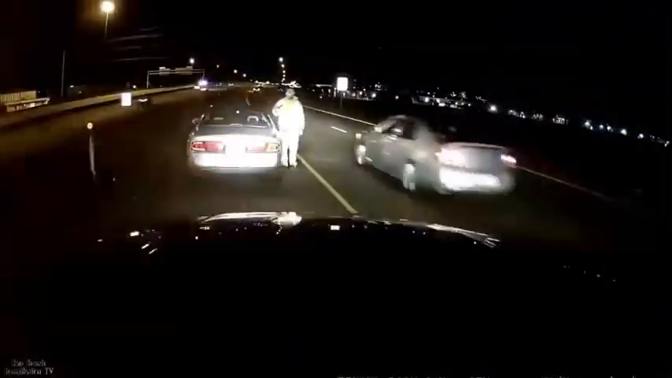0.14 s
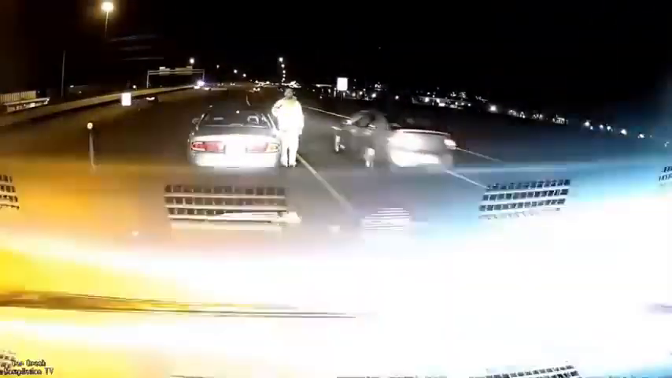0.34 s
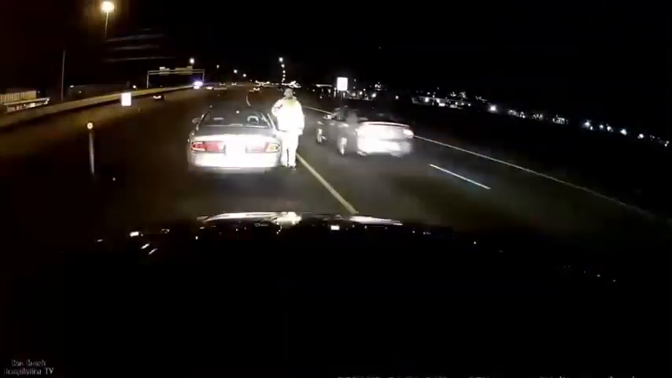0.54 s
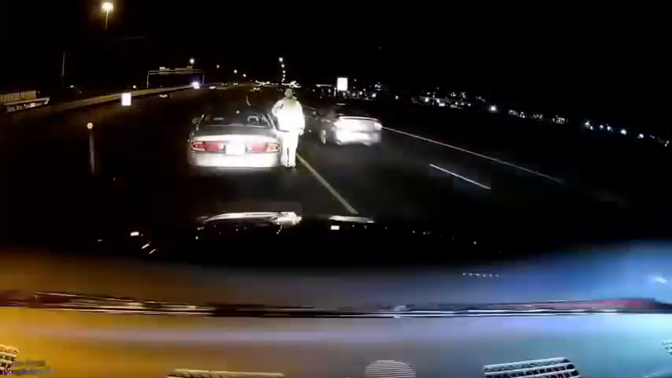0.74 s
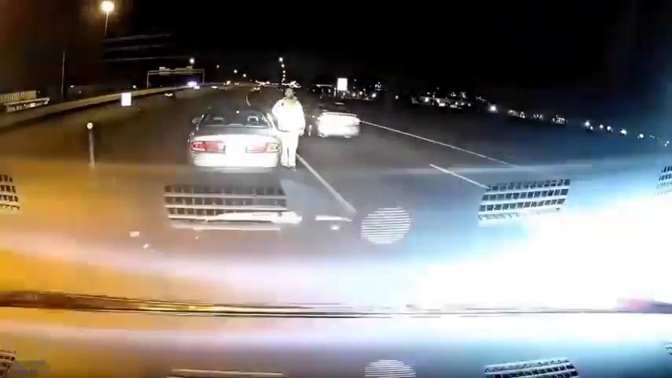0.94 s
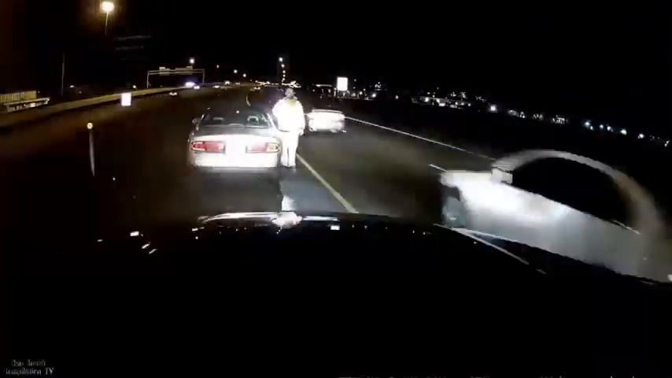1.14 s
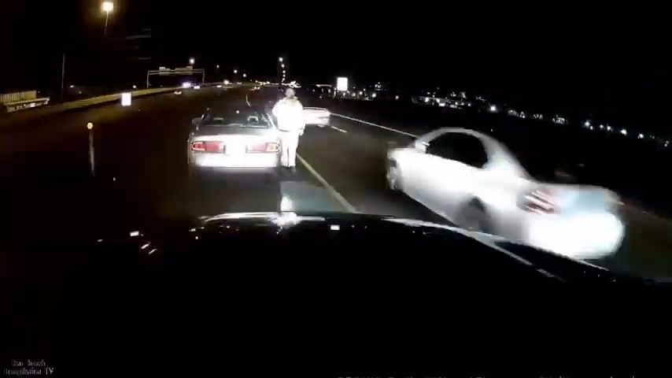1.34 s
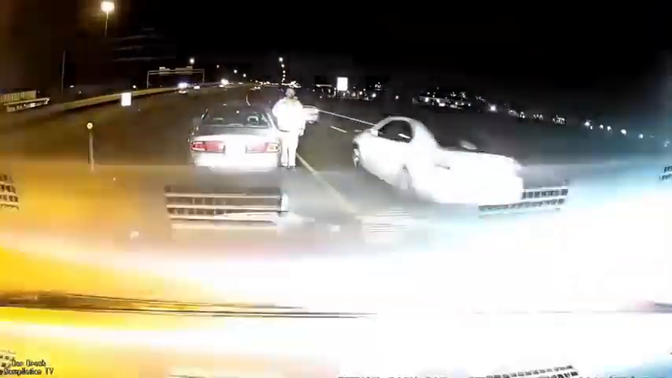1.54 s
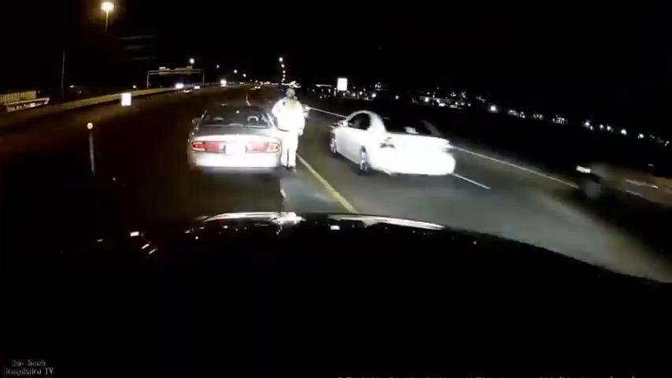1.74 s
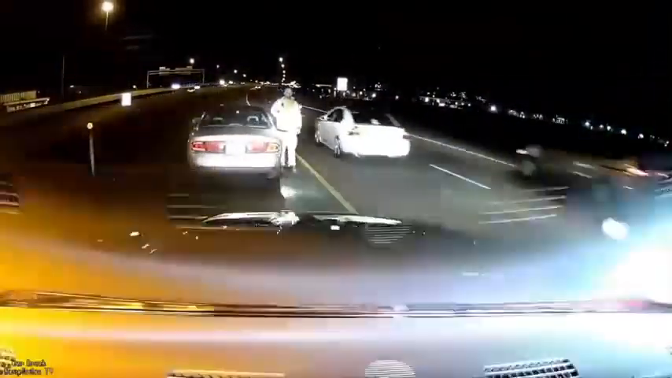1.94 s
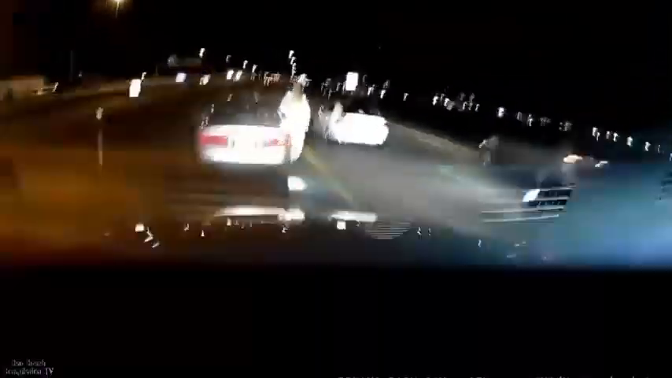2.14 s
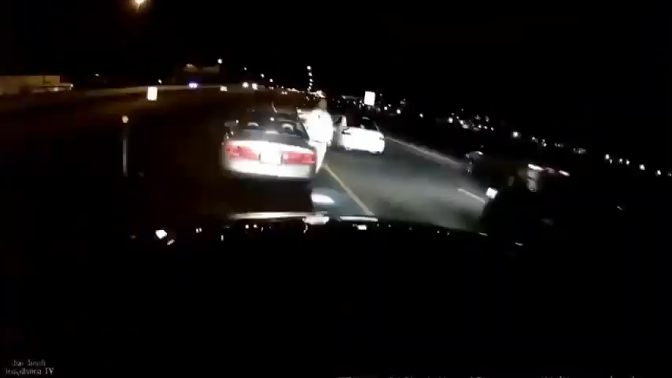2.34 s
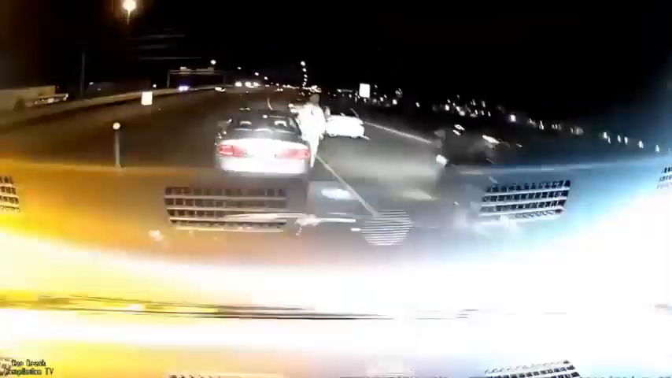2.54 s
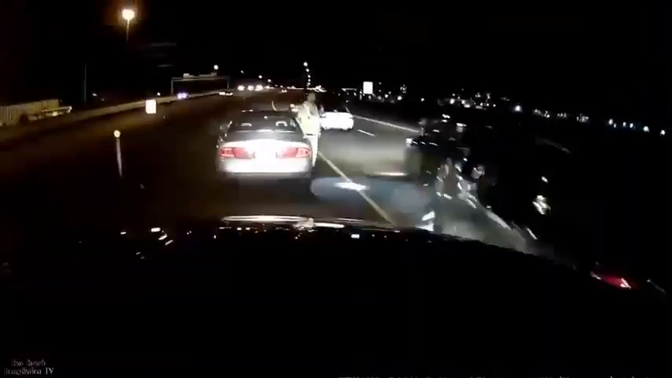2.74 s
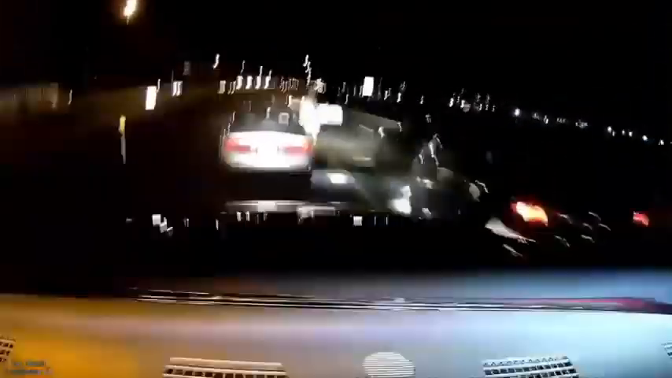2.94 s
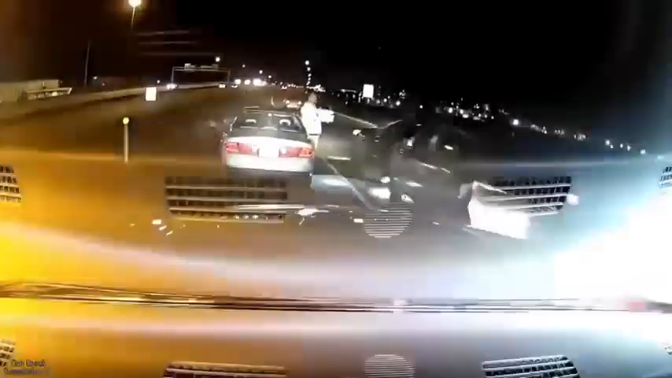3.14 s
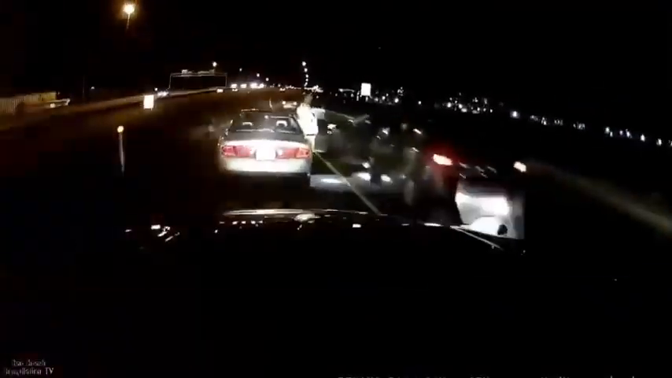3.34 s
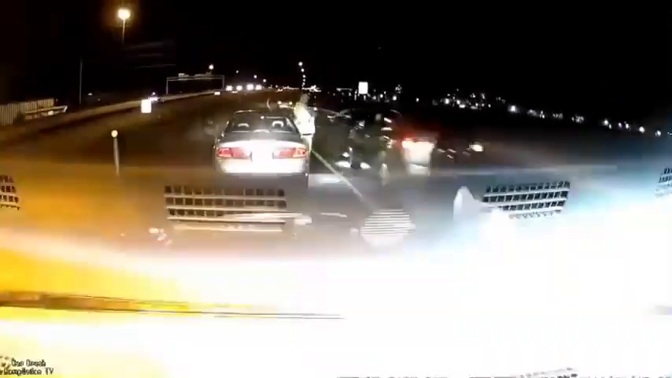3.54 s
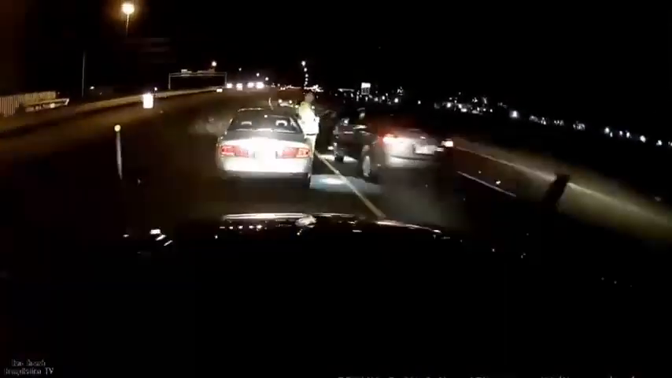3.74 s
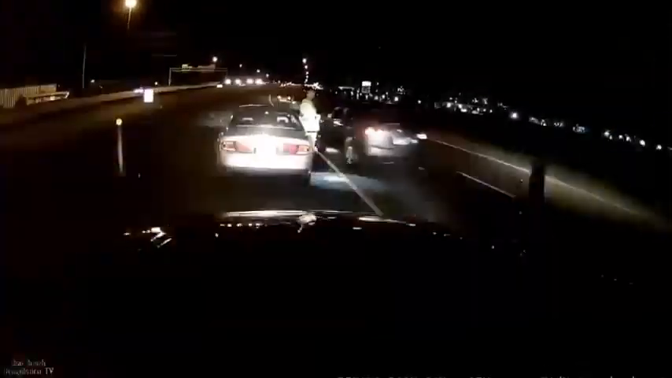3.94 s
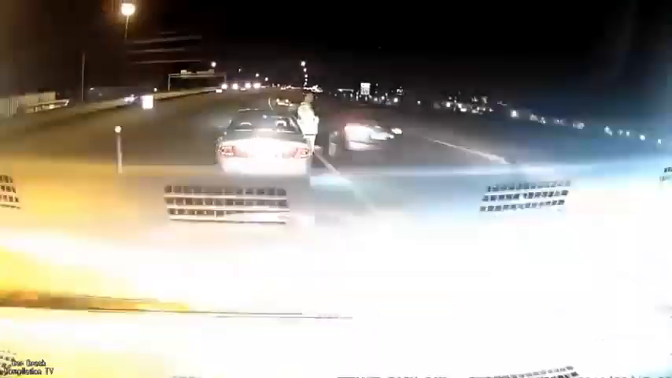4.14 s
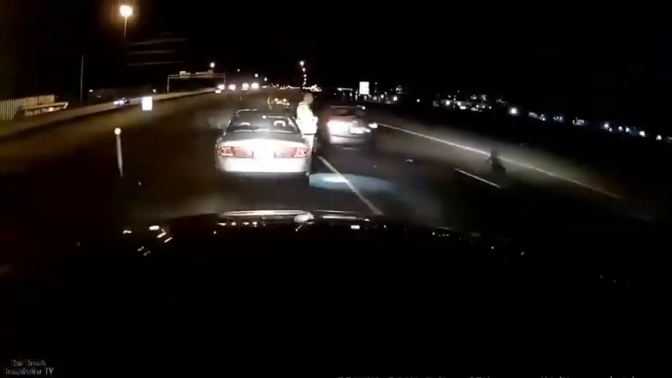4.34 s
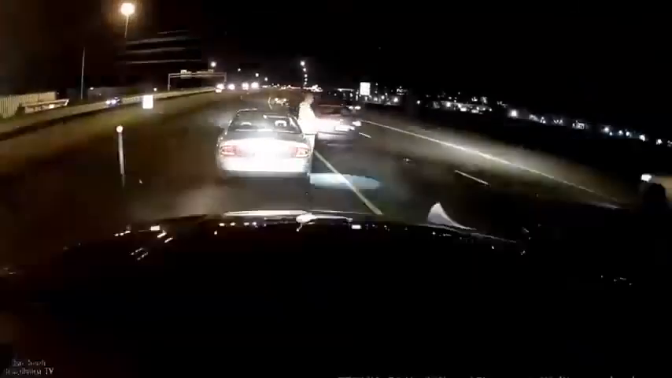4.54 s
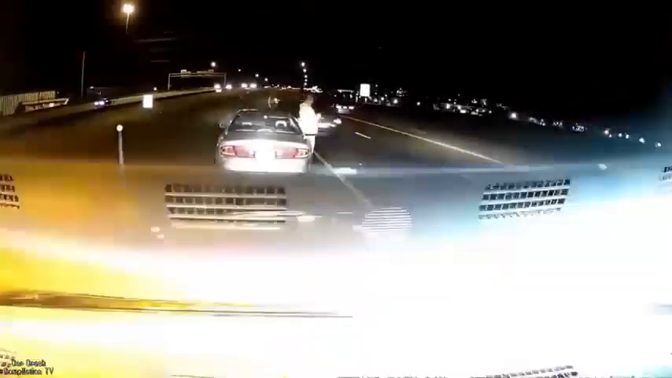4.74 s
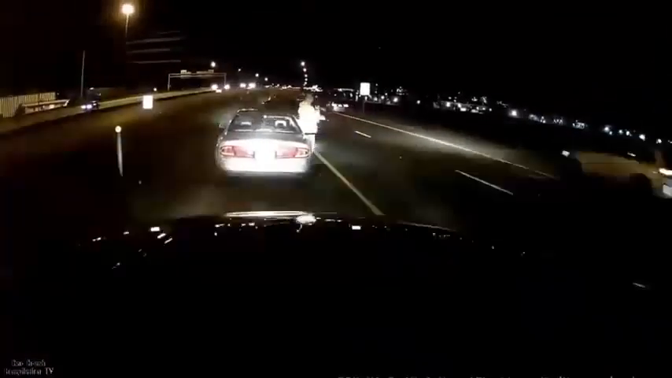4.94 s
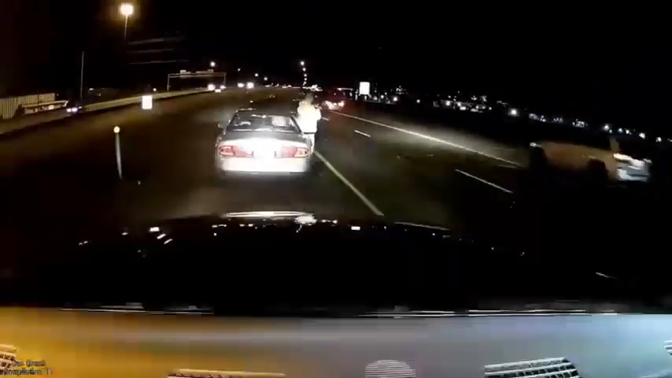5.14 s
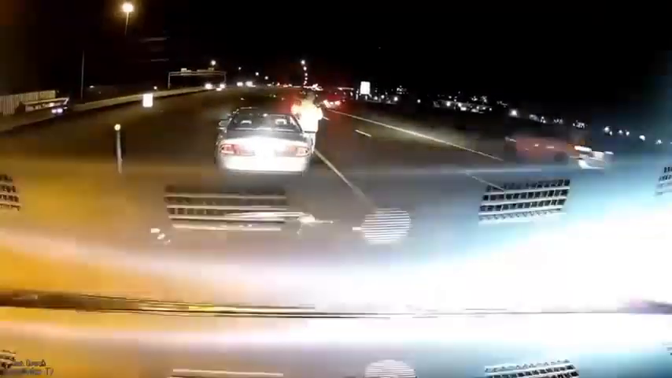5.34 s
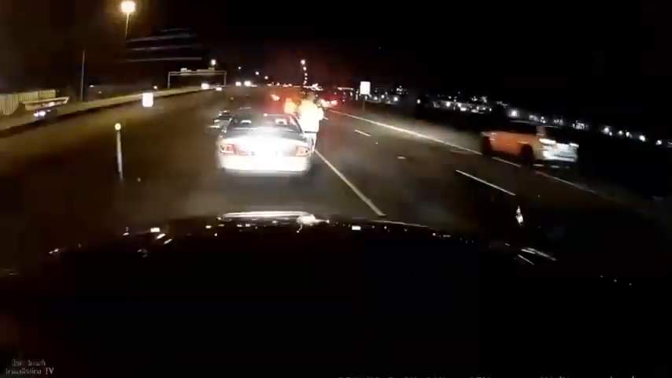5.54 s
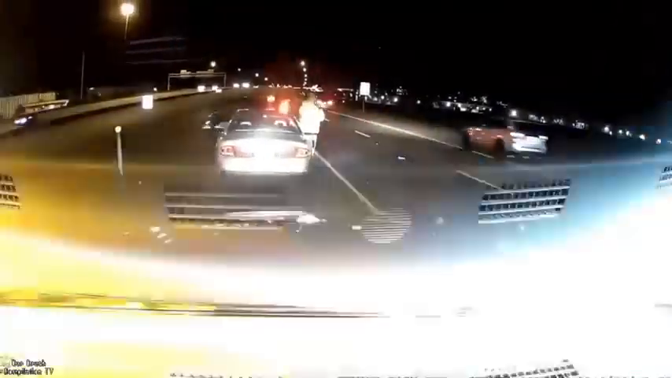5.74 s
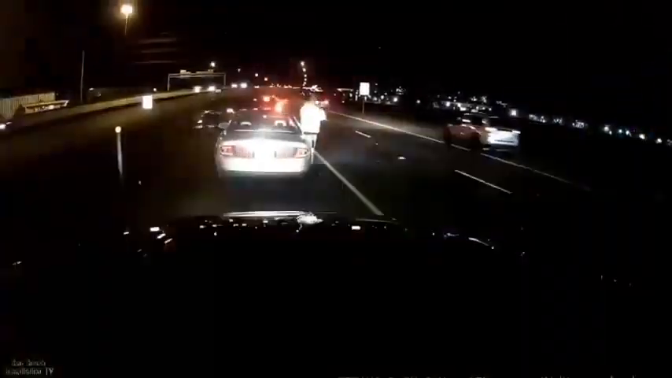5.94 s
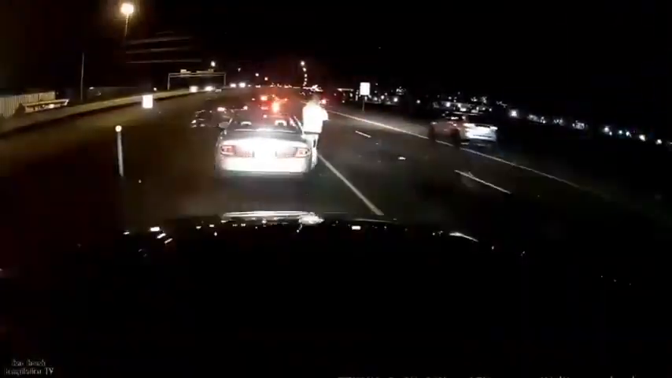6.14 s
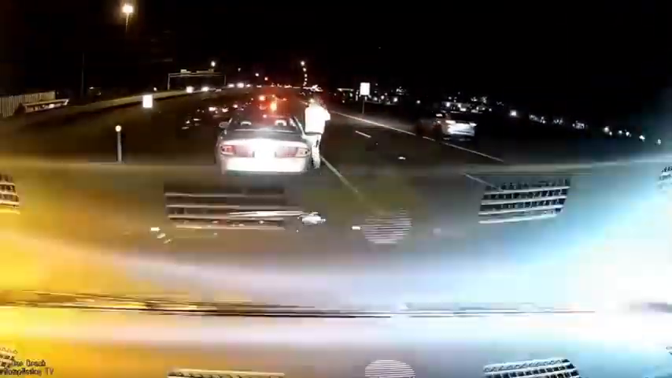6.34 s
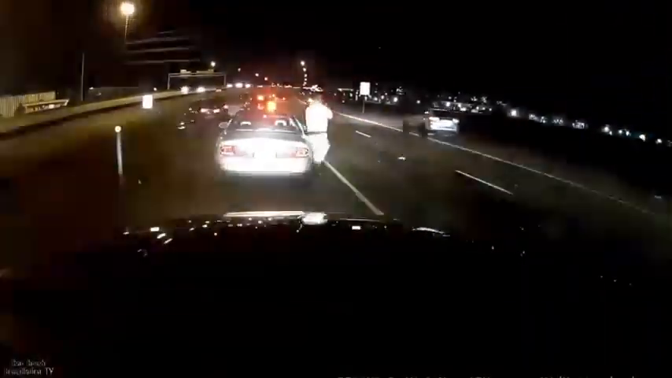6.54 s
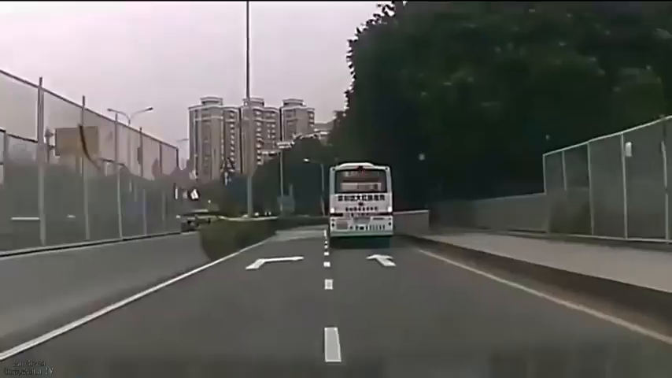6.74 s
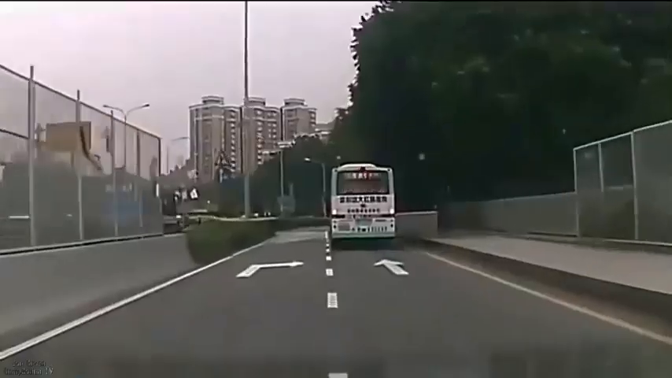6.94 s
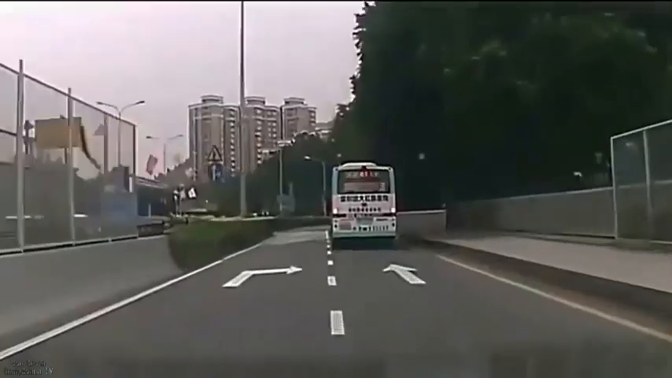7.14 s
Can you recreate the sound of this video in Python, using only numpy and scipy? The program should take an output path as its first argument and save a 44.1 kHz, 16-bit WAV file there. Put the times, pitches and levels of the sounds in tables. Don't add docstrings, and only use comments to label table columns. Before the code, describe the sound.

A microphone in a closed car cabin picks up boomy road noise and one close pass. Brief braking squeals lead into a distorted double-surge collision, with heavy thuds, folding sheet metal and grinding. Very sharp glass cracks come moments later, then rattling fragments, low suspension throbs and a second tyre squeal. Traffic continues under small clicks until an abrupt cut, followed by another car's soft low hum.

```python
import sys
import numpy as np
from scipy import signal
from scipy.fft import rfft, irfft, next_fast_len
from scipy.io import wavfile
from scipy.ndimage import map_coordinates

SR = 44100
rng = np.random.default_rng(int(sys.argv[2]) if len(sys.argv) > 2 else 0)


def unload_wav(signal):
    wavfile.write(
        sys.argv[1],
        SR,
        np.round(np.clip(np.atleast_2d(signal).T, -1, 1) * 32767).astype(np.int16),
    )


def ratio_of_db(decibels):
    return 10 ** (np.asarray(decibels, float) / 20)


N = 321165
HIT_S, CUT_S = 2.088, 6.687


def unit(x):
    return x / np.sqrt(np.mean(x ** 2) + 1e-20)


def seconds():
    return np.arange(N) / SR


def curves(rows, held=False):
    s, *columns = np.transpose(rows)
    outside = [] if held else [-150, -150]
    return [np.interp(seconds(), s, column, *outside) for column in columns]


def wobble(rate):
    knots = rng.standard_normal(int(N * rate / SR) + 4)
    return map_coordinates(knots, [np.arange(N) * rate / SR])


def filtered(x, response):
    m = next_fast_len(N + 8192)
    return irfft(rfft(x, m) * response(np.fft.rfftfreq(m, 1 / SR)), m)[..., :N]


def resonant(x, modes):
    return filtered(x, lambda f: sum(ratio_of_db(db) * f * w / (hz * hz - f * f + 1j * f * w) for hz, w, db in modes))


def rush(spectrum, grit_db, rate):
    f, v = np.transpose(spectrum)
    source = rng.standard_normal(N) * ratio_of_db(grit_db * wobble(rate))
    return unit(filtered(source, lambda hz: ratio_of_db(np.interp(np.log(hz + 1), np.log(f + 1), v))))


# [f/Hz, level/dB per Hz]
RUMBLE = [(12, -38), (20, 3), (42, -3.5), (92, -3), (125, -11), (145, -17.5), (171, -6.5), (194, 0),
          (260, -27.5), (320, -9.5), (420, -47), (700, -120)]
# [f/Hz, level/dB per Hz]
ROAR = [(150, -14), (250, 6.5), (273, -5), (377, -5.5), (626, -5.5), (976, -4), (1090, -12), (1550, -8),
        (2050, -23), (2730, -48), (4620, -120)]
# [f/Hz, level/dB per Hz]
HISS = [(1060, -6), (1800, -30.5), (2240, 10), (2870, 15.5), (5290, -2.5), (6470, -49), (7030, -41.5),
        (8590, -27.5), (14600, -9), (15000, -34), (16000, -54)]
# [f/Hz, level/dB per Hz]
WHOOSH = [(24, -35), (40, -6), (76, -3), (162, -11), (381, 1), (670, -15.5), (1240, -5.5), (2170, -22.5),
          (2990, -16.5), (14000, -61.5)]
# [f/Hz, width/Hz, level/dB]
BOOM = (205, 22, -38.5)
# [f/Hz, width/Hz, level/dB]
SEAL = [(10450, 300, 0), (11800, 300, -3)]
# [t/s, level/dB]
HISS_LEVEL = [(0, -56), (.5, -54), (.8, -55), (1.05, -52), (1.36, -55), (1.5, -47), (1.65, -44), (1.8, -47),
              (1.95, -43), (3.5, -45), (3.95, -46), (4.2, -49), (4.45, -47), (4.8, -54), (5.7, -57), (6.05, -54),
              (6.6, -56)]
# [t/s, level/dB, half width/s, screened off beyond/s]
PASSING = (1.205, -26, .03, .15)
RUMBLE_DB, ROAR_DB, SEAL_DB, QUIET_DB = -44, -38.5, -86, -56
RUMBLE_GROWS, ROAR_GROWS, SEAL_GROWS = .15, .3, 1.3


def traffic():
    hiss_db, = curves(HISS_LEVEL, held=True)
    busy_db = hiss_db - QUIET_DB
    boom = ratio_of_db(BOOM[2]) * unit(resonant(rng.standard_normal(N), [BOOM]))
    rumble = ratio_of_db(RUMBLE_DB + RUMBLE_GROWS * busy_db) * rush(RUMBLE, grit_db=2.5, rate=6.9)
    roar = ratio_of_db(ROAR_DB + ROAR_GROWS * busy_db) * rush(ROAR, grit_db=1.54, rate=20)
    hiss = ratio_of_db(hiss_db - 1.33) * rush(HISS, grit_db=2, rate=150)

    s, db, near, seen = PASSING
    away = seconds() - s
    close = ratio_of_db(db - 25 * (away / seen) ** 6) / np.hypot(1, away / near)
    whoosh = close * rush(WHOOSH, grit_db=1, rate=60)

    draught = ratio_of_db(SEAL_DB + SEAL_GROWS * busy_db) * (away < HIT_S - s)
    seal = (draught + ratio_of_db(-44) * close) * unit(resonant(rng.standard_normal(N), SEAL))
    return rumble + roar + hiss + boom + whoosh + seal


# [f/Hz, level/dB]
WHINE = [(7214, -66), (14422, -75)]


def whine():
    return sum(ratio_of_db(db) * np.sin(2 * np.pi * hz * seconds()) for hz, db in WHINE)


# [t/s, f/Hz, level/dB]
SQUEAL = [
    [(1.4, 940, -47), (1.5, 965, -46), (1.56, 975, -55), (1.62, 1005, -40), (1.7, 900, -49),
     (1.8, 850, -52), (1.9, 737, -47), (2.03, 740, -44)],
    [(3.3, 829, -47), (3.4, 799, -38), (3.6, 800, -45), (3.7, 825, -43), (3.9, 795, -41), (4.08, 815, -45),
     (4.2, 877, -46), (4.35, 880, -57)],
]
OVERTONES = [(1, 0), (2, -1), (3, 0.5), (4, -4)]  # (ratio, dB)
WINDOW_HZ, WINDOW_LEAK = 1800, .2


def squeal():
    out = 0
    for rows in SQUEAL:
        hz, db = curves(rows)
        for ratio, tyre_db in [(1, 4), (1.09, -4)]:
            shaky_hz = ratio * hz * (1 + .016 * wobble(120))
            phase = 2 * np.pi * np.cumsum(shaky_hz) / SR
            tones = sum(ratio_of_db(tone_db) * np.sin(k * phase) for k, tone_db in OVERTONES)
            out = out + ratio_of_db(2.1 * wobble(25) + tyre_db + db) * tones
    return filtered(out, lambda f: WINDOW_LEAK + (1 - WINDOW_LEAK) / (1 + (f / WINDOW_HZ) ** 16))


# [f/Hz, level/dB per Hz]
SHELL = [(8.8, -33.5), (15, -7), (65, -2), (108, -8), (135, -8), (161, -15.5), (200, -15.5), (260, -45),
         (440, -120)]
# [f/Hz, level/dB per Hz]
CRUMPLE = [(71, -21.5), (120, -4), (161, -9), (265, -5.5), (335, -6.5), (398, -10.5), (694, -13),
           (1590, -16.5), (2300, -64), (2990, -58), (5060, -120)]
# [f/Hz, level/dB per Hz]
GRIND = [(1060, -27.5), (1800, 17), (2010, 12), (4470, 5.5), (5030, -5.5), (6210, -10.5), (7000, -17.5),
         (9100, -39), (15400, -120)]
# [f/Hz, level/dB per Hz]
DUST = [(3530, -35), (6000, -9.5), (7340, 5.5), (8400, -0.5), (10100, -1.5), (14900, -12.5), (16000, -3.5)]
# [t/s, push]
LURCH = [(2.094, -1.5), (2.105, .7), (2.146, -1), (2.163, 1.3), (2.170, -2), (2.188, 1.1), (2.202, -1.6),
         (2.275, 1.2), (2.292, -1), (2.357, -1.8), (2.400, 1.9), (2.430, -1), (2.465, .45), (2.562, -.45),
         (2.6, .2)]
# [t/s, level/dB]
CRUSH = [
    (2.05, -43),
    (2.088, -22),
    (2.13, -25),
    (2.21, -25),
    (2.25, -12),
    (2.295, -8),
    (2.36, -25),
    (2.44, -26),
    (2.56, -36),
]
# [t/s, level/dB]
SCRAPE = [
    (2.5, -41),
    (2.68, -32),
    (2.74, -30),
    (2.83, -21),
    (2.9, -30),
    (3.07, -31),
    (3.36, -39),
    (3.45, -49),
    (3.65, -53),
]
HOLD_S, SHELL_DB, RELEASE_DB_PER_S = .35, -8, 85
FIRST_LURCH_S, LURCH_SLOWS = .005, .025


def crash():
    t = seconds()
    crush_db, = curves(CRUSH)
    scrape_db, = curves(SCRAPE)

    lurch = 0
    for s, push in LURCH:
        length = .55 * (FIRST_LURCH_S + LURCH_SLOWS * (s - HIT_S))
        lurch = lurch + push * np.exp(-((t - s) / length) ** 2)

    release_db = RELEASE_DB_PER_S * np.clip(t - HIT_S - HOLD_S, 0, None)
    shell = ratio_of_db(SHELL_DB - release_db) * (t > HIT_S) + ratio_of_db(scrape_db - 7)
    crumple = ratio_of_db(crush_db + 4.5) + ratio_of_db(scrape_db + 3)
    metal = shell * rush(SHELL, grit_db=2.5, rate=12) + crumple * rush(CRUMPLE, grit_db=4.5, rate=120)

    grind = ratio_of_db(1.05 * crush_db - 10) + ratio_of_db(.9 * scrape_db - 6)
    dust = ratio_of_db(.8 * crush_db - 40) + ratio_of_db(.55 * scrape_db - 33)
    glass = grind * rush(GRIND, grit_db=2.5, rate=110) + dust * rush(DUST, grit_db=6.5, rate=67)
    contact = np.clip((t - 2.091) / .002, .03, 1)
    return contact * (lurch + metal) + glass


# [f/Hz, level/dB per Hz]
KNOCK = [(240, -36.5), (400, -3.5), (1440, -5.5), (1580, 0.5), (2100, -22), (2730, -49.5), (4620, -120)]
# [f/Hz, level/dB per Hz]
CRACK = [(1180, -37), (2000, 1), (4360, 2), (5160, 0), (6270, -12), (6800, -22.5), (8840, -36),
         (15000, -120)]
# [f/Hz, level/dB per Hz]
SPARKLE = [(3820, -38.5), (6500, -2.5), (7360, 2), (8430, -3.5), (12800, -2), (14300, -4.5), (16000, -18)]
# [t/s, peak level/dB, length/s, heft/dB]
PARTS = [(2.0555, -36, .016, 18), (2.093, -21, .014, 10), (2.147, -26, .012, 10), (2.2454, -17, .006, 12),
         (2.406, -22, .02, 3), (2.535, -28, .018, 14), (2.628, -31, .005, 14), (2.6584, -27.5, .014, 12),
         (2.9402, -30, .014, 13), (3.0117, -23, .016, 10), (3.026, -16, .009, -5), (3.037, -11, .008, 3),
         (3.0695, -29, .01, 13), (3.1047, -20, .004, 3), (3.1163, -21, .027, -2), (3.172, -31, .008, 6),
         (3.2025, -17, .009, 7), (3.269, -31, .008, 6), (3.278, -29, .014, 21), (3.3024, -33, .006, 8),
         (3.345, -31, .012, 12), (3.872, -29, .009, 12), (3.909, -30, .005, 5), (4.13, -34, .018, 7)]
# [t/s, peak level/dB, length/s, sharpness/dB]
GLASS = [(2.3605, -20.5, .007, -4), (2.528, -23, .027, -6), (2.7398, -29, .02, -3), (2.7575, -21, .017, -3),
         (2.8005, -21, .02, -11), (2.8252, -1.5, .005, 12), (2.8305, -6, .012, -6), (2.842, -5.5, .005, 6),
         (2.8564, -16.5, .019, -4), (2.8734, -11.5, .005, 5), (2.899, -4, .003, 8), (2.9054, -18, .003, 6),
         (3.2144, -26.5, .027, -10), (3.4, -42, .02, 0), (3.5744, -30.5, .016, -10), (3.635, -40, .012, -6),
         (3.6582, -33, .011, -13), (3.7668, -38.5, .014, -4), (5.43, -36, .013, -2), (5.44, -31.5, .012, 0),
         (5.4524, -37, .01, -2), (5.4624, -41.5, .027, -5), (5.7807, -37.5, .008, -2),
         (6.4502, -23, .008, -13)]
# [t/s, peak level/dB]
CRUMBS = [(2.9907, -27), (3.5567, -36), (3.72, -38), (3.82, -40), (4.02, -42), (4.18, -39), (4.2517, -39.5),
          (4.322, -36), (4.4618, -36.5), (4.574, -34), (4.6563, -37.5), (5.147, -42), (5.6825, -29),
          (5.7, -33), (5.7184, -35), (5.967, -39), (6.0295, -42), (6.107, -44), (6.2, -42), (6.412, -41),
          (6.6009, -40.5), (6.6543, -44)]
# [length/s, knock level/dB, sparkle level/dB]
CRUMB = (.009, 3, -28)
# [from t/s, to t/s, count, first level/dB, loss/dB per s]
RATTLE = (2.45, 4.8, 70, -36, 5)
PART_SPARKLE_DB, GLASS_KNOCK_DB = -19, -5
PART_HZ, GLASS_HZ, CRUMB_HZ, SHARP_HZ_PER_DB = 2800, 4300, 2900, 90


def landings():
    pieces = [(s, db, heft_db, PART_SPARKLE_DB, length, PART_HZ) for s, db, length, heft_db in PARTS]
    for s, db, length, sharp_db in GLASS:
        pieces.append((s, db, GLASS_KNOCK_DB, sharp_db, length, GLASS_HZ + SHARP_HZ_PER_DB * sharp_db))
    crumb_s, knock_db, sparkle_db = CRUMB
    pieces += [(s, db, knock_db, sparkle_db, crumb_s, CRUMB_HZ) for s, db in CRUMBS]
    start, end, count, first_db, loss_db = RATTLE
    for when, size in rng.random((int(count), 2)):
        late = (end - start) * when ** 1.5
        db = first_db - loss_db * late - 8 * size
        pieces.append((start + late, db, knock_db, sparkle_db + 2, crumb_s, CRUMB_HZ))
    return pieces


def shards():
    burst, ring = np.zeros((3, N + SR)), np.zeros(N + SR)
    t = np.arange(SR // 8) / SR
    attack = 1 - np.exp(-t / .0005)
    for s, db, knock_db, sparkle_db, length, hz in landings():
        at = round(s * SR)
        age = t / max(length, .002)
        body = ratio_of_db(-14 * age ** 2) + ratio_of_db(-18 - 5 * age)
        knock = ratio_of_db(knock_db - 0.84 - 8.7 * age)
        shape = np.array([knock, body, ratio_of_db(sparkle_db) * body])
        burst[:, at:at + len(t)] += ratio_of_db(db - 5) * shape * attack
        pitch = hz * (1 + .12 * rng.standard_normal())
        ring[at:at + len(t)] += ratio_of_db(db - 2.5 - 60 * t / 0.016) * np.sin(2 * np.pi * pitch * t)
    contacts = [rush(KNOCK, grit_db=2, rate=200), rush(CRACK, grit_db=3.5, rate=450),
                rush(SPARKLE, grit_db=4.5, rate=600)]
    return (burst[:, :N] * contacts).sum(0) + ring[:N]


# [f/Hz, width/Hz, level/dB]
PANELS = [(130, 30, -4), (260, 45, 2), (310, 30, -2), (408, 60, -7.5)]
PANELS_GIVE_S, PANELS_FADE_DB_PER_S = 2.34, 65


def panels():
    t = seconds()
    fade_db = PANELS_FADE_DB_PER_S * np.clip(t - PANELS_GIVE_S, 0, None)
    drum_db = .6 * curves(CRUSH)[0] - 2.5 - fade_db
    blows = rng.standard_normal(N) * ratio_of_db(2.5 * wobble(60))
    muffled = filtered(blows, lambda hz: .4 + .6 / (1 + (hz / 5500) ** 10))
    return ratio_of_db(drum_db) * (t > HIT_S) * unit(resonant(muffled, PANELS))


# [t/s, f/Hz, level/dB]
SWAY = [
    (3.02, 38, -30),
    (3.17, 33, -29),
    (3.31, 35, -28),
    (3.75, 32.1, -31),
    (4.151, 39.2, -36),
    (4.55, 34.4, -38),
    (5.22, 35, -34),
]


def sway():
    t = seconds()
    return sum(ratio_of_db(db) * np.exp(-((t - s) / 0.061) ** 2) * np.sin(2 * np.pi * hz * t) for s, hz, db in SWAY)


# [f/Hz, level/dB per Hz]
DULL = [(12, -48), (20, 0.5), (53, -18), (71, -14), (97, 0), (142, -20.5), (167, -17.5), (368, -21.5),
        (652, -35.5), (789, -29), (1080, -38), (6000, -80), (7800, -119), (13200, -120)]
# [f/Hz, width/Hz, level/dB]
HUM = [(90.4, 16, -3), (800, 38, -20), (1000, 66, -20), (1300, 55, -30), (2150, 113, -34)]
FADE_FROM_S, FADE_S, OTHER_DB = 6.78, .5, -42.5


def other_cabin():
    source = rush([(30, 0), (60, 8), (2200, -6), (4000, -40), (6000, -120)], grit_db=1.5, rate=16)
    hum = unit(resonant(source, HUM))
    fade = np.clip((seconds() - FADE_FROM_S) / FADE_S, 0, 1) ** 1.15
    return ratio_of_db(OTHER_DB) * fade * (rush(DULL, grit_db=-1, rate=11) + ratio_of_db(-7) * hum)


def flattened(x, ceiling):
    return x / (1 + (x / ceiling) ** 6) ** (1 / 6)


EMPHASIS_HZ, EMPHASIS_DB = 6200, 10


def overload(x):
    def lift(hz):
        return ratio_of_db(EMPHASIS_DB * (1 - 1 / (1 + (hz / EMPHASIS_HZ) ** 10)))

    clipped = flattened(filtered(x, lift), .93)
    corner_hz = 2
    return filtered(clipped, lambda hz: 1j * hz / (corner_hz + 1j * hz) / lift(hz))


def scene():
    first = overload(traffic() + whine() + squeal() + crash() + panels() + sway())
    first = first + flattened(shards(), .88)
    fade = np.clip((CUT_S - seconds()) / .002, 0, 1)
    return (first * fade + other_cabin())[None]


def band_limit(x):
    return signal.sosfilt(signal.butter(12, 16470, fs=SR, output="sos"), x)


def record(dry):
    return band_limit(dry)


dry = scene()
out = record(dry)
unload_wav(out)
```